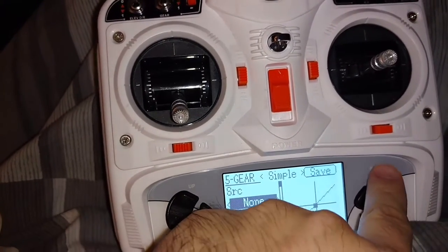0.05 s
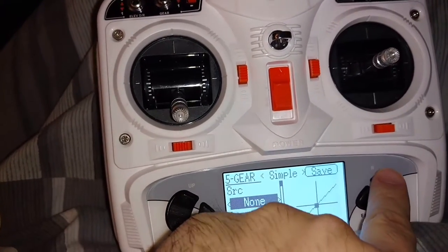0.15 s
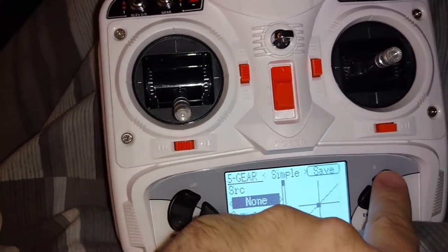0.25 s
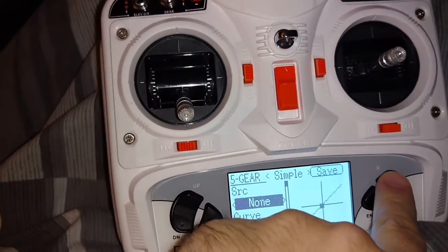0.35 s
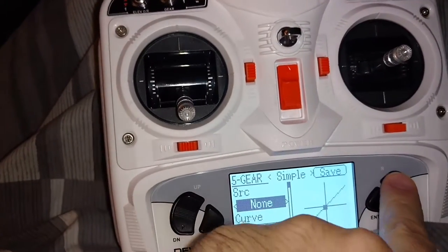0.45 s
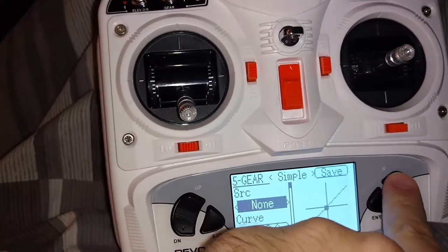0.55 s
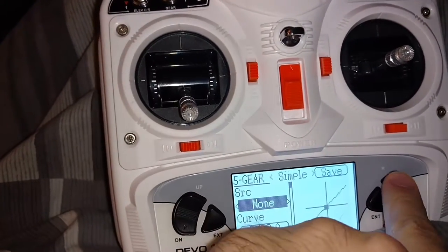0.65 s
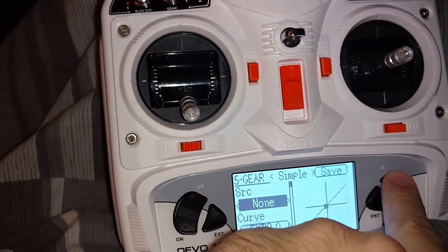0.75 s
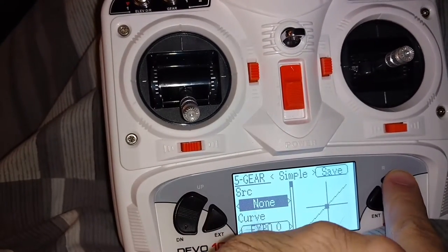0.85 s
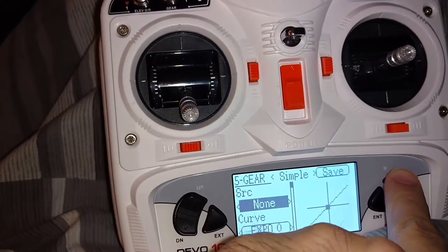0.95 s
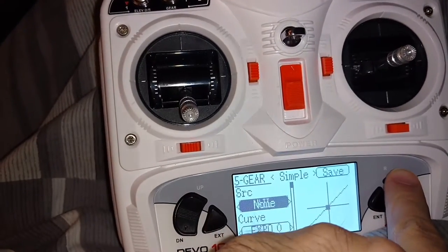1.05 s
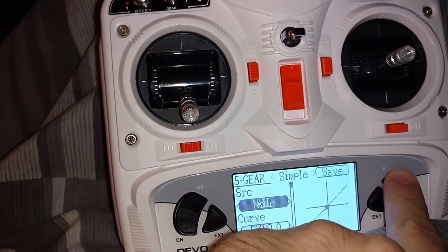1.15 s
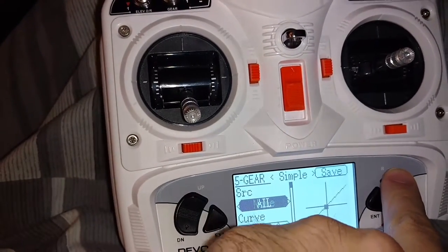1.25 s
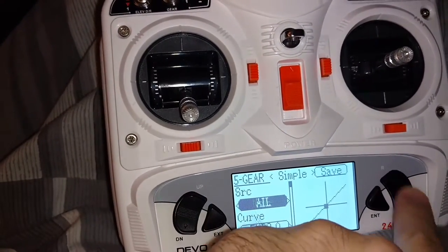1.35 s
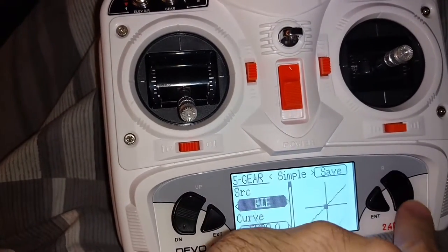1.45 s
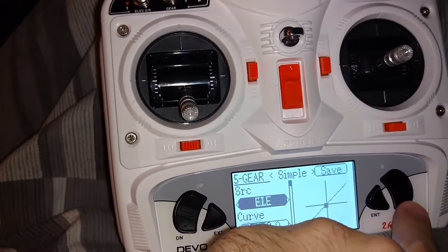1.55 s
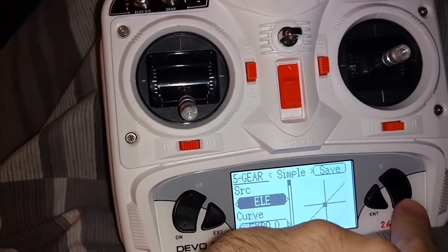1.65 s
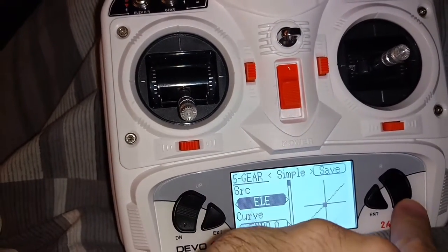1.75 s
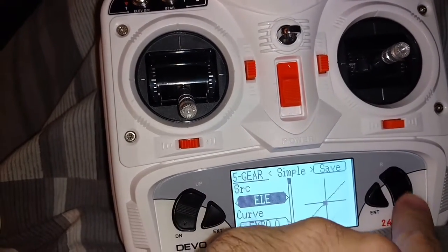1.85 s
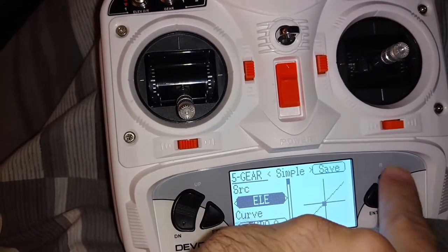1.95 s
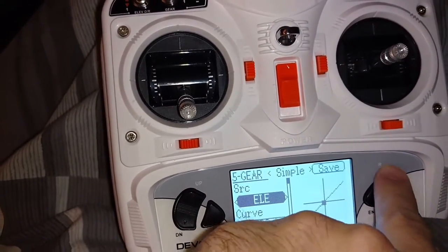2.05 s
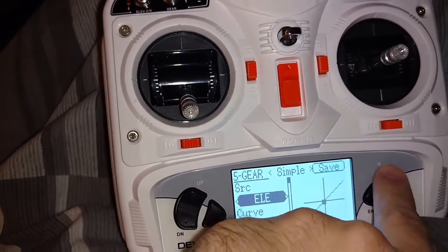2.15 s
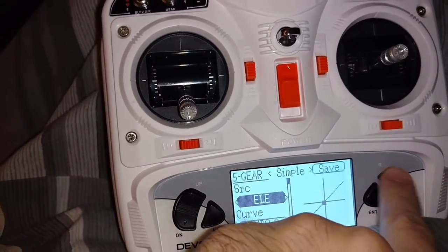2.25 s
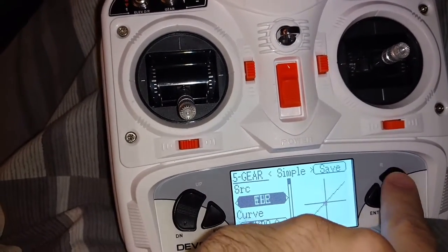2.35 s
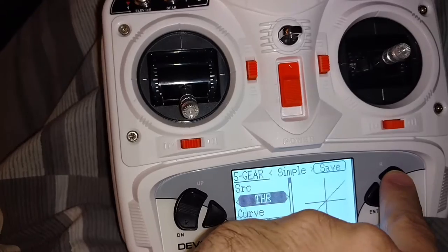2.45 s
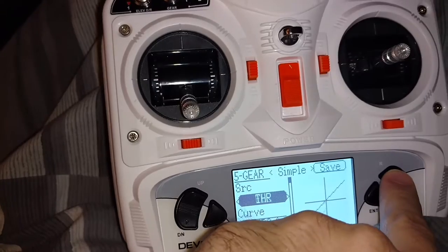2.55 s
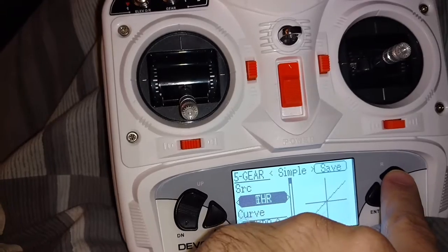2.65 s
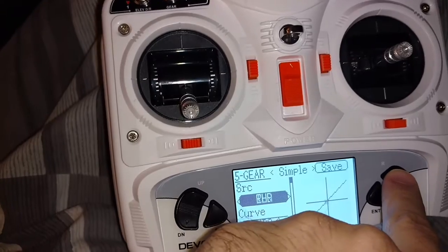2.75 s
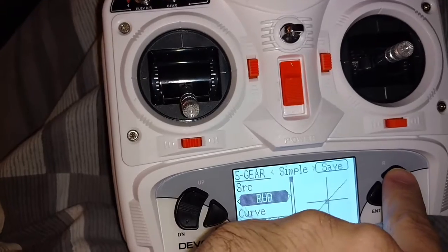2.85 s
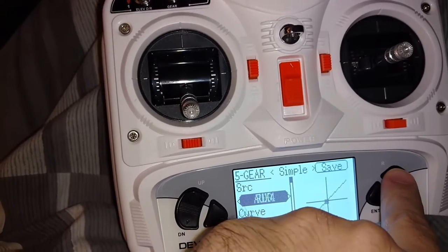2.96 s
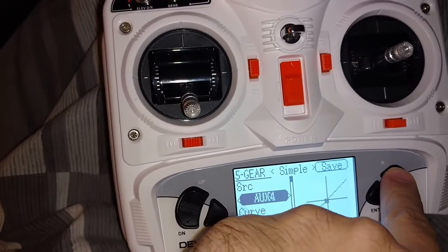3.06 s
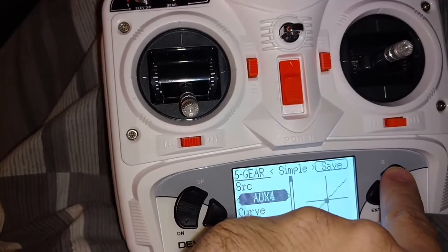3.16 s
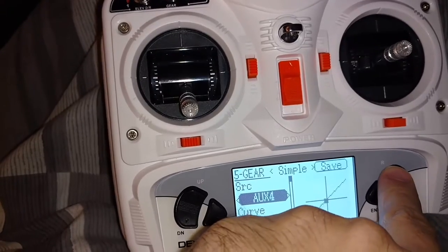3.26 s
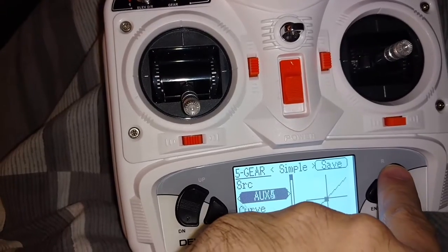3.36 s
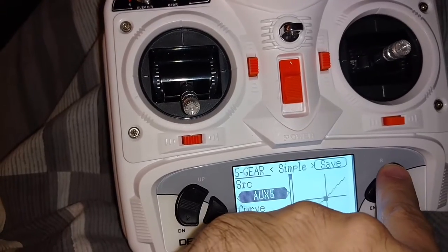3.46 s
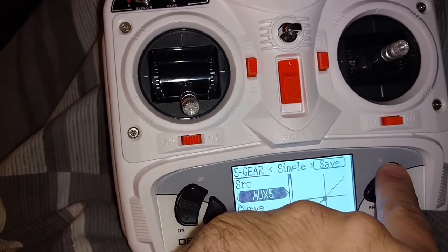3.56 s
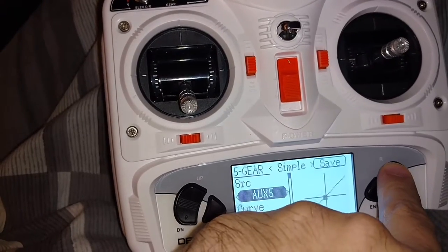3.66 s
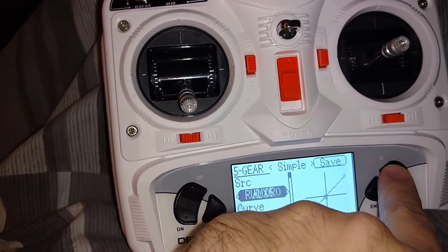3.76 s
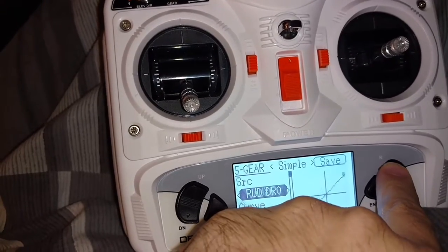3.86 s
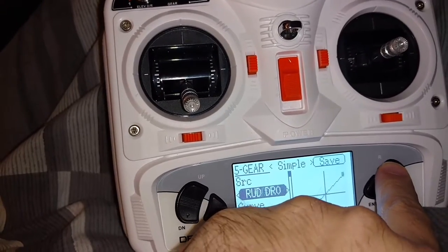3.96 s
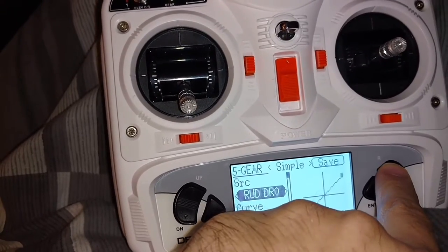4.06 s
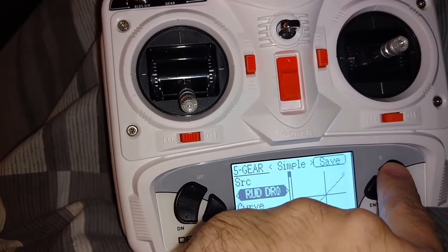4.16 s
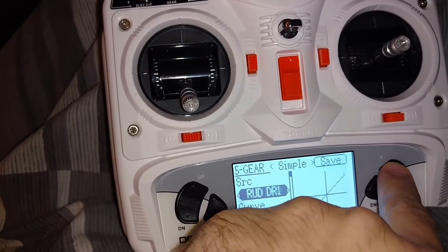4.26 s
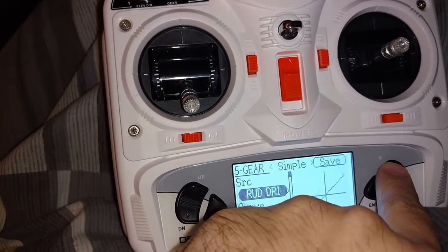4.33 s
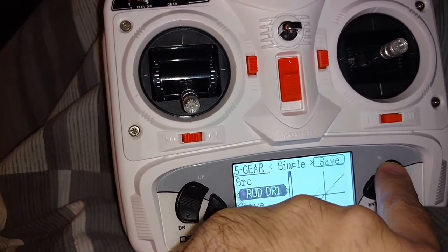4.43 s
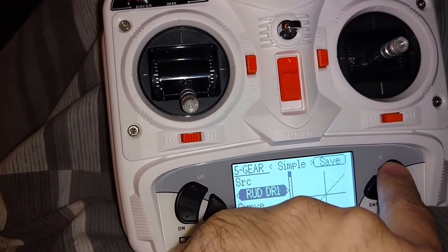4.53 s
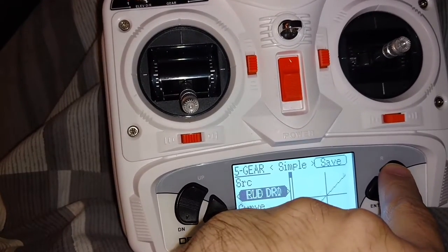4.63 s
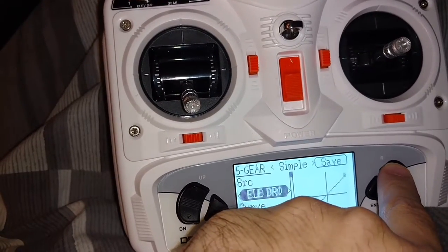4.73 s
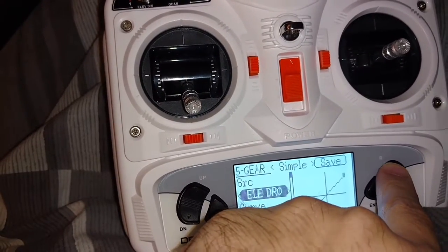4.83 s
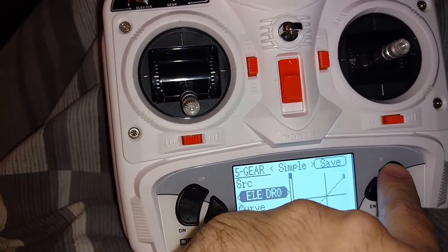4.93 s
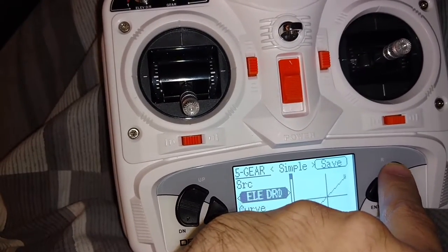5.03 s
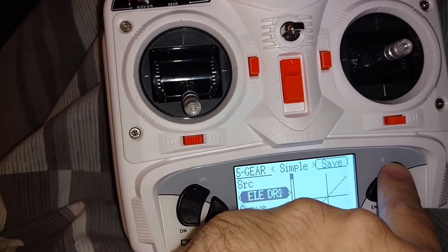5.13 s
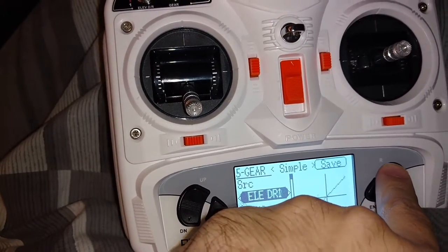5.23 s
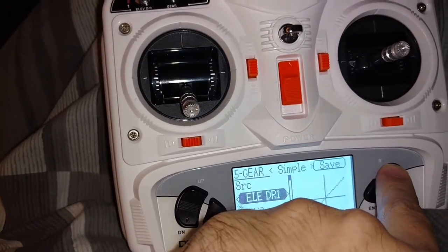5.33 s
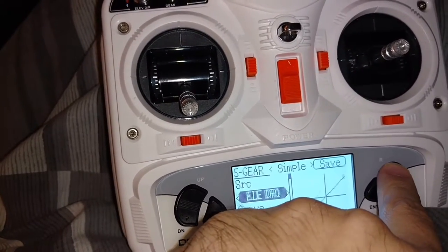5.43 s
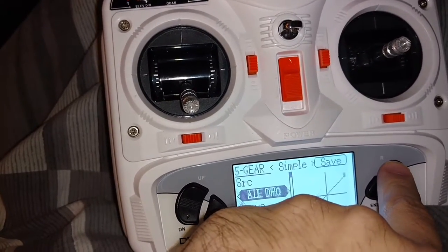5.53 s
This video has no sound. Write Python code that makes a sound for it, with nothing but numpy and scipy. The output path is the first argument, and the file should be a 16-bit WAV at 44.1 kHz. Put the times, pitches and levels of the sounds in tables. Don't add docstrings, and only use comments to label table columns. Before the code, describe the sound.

Close, crisp button presses with softer releases repeat at an unhurried pace, with small creaks, skin rustle and faint microphone hiss.

```python
import sys
import numpy as np
from scipy import signal
from scipy.fft import rfft, irfft, next_fast_len
from scipy.io import wavfile
from scipy.ndimage import uniform_filter1d

SR = 44100
rng = np.random.default_rng(int(sys.argv[2]) if len(sys.argv) > 2 else 0)


def ratio_of_db(decibels):
    return 10 ** (np.asarray(decibels, float) / 20)


def master(y):
    cut = np.clip(np.atleast_2d(y).T, -1, 1)
    pcm = np.round(cut * 32767)
    wavfile.write(sys.argv[1], SR, pcm.astype(np.int16))


N = 246519


def log_curve(points, hz):
    point_hz, value = np.array(points).T
    return np.interp(np.log(hz + 1e-9), np.log(point_hz), value)


def filtered(x, response):
    size = next_fast_len(N + 512)
    hz = np.arange(size // 2 + 1) * SR / size
    return irfft(rfft(x, size) * response(hz), size)[:N]


def sos_filtered(x, sos):
    return signal.sosfilt(sos, x)


def noise(spectrum):
    return filtered(rng.standard_normal(N), lambda hz: ratio_of_db(log_curve(spectrum, hz)))


def rms_one(x):
    return x / np.sqrt(np.mean(x ** 2) + 1e-20)


def strikes(times, sizes):
    clicks = np.full(N, 1e-18)
    clicks[np.round(np.asarray(times) * SR).astype(int)] += sizes
    return clicks


def ring(clicks, hz, t60):
    radius = ratio_of_db(-60 / (t60 * SR))
    angle = 2 * np.pi * hz / SR
    return signal.lfilter([0, np.sin(angle)], [1, -2 * radius * np.cos(angle), radius ** 2], clicks)


WHINE_HZ = [6993, 7913]
# (left level [dB], right level [dB])
WHINE_DB = [
    [-77, -112],
    [-81.5, -78],
]


def whines():
    width_hz = 16
    t60 = np.log(1000) / np.pi / width_hz
    total = 0
    for hz, port_db in zip(WHINE_HZ, WHINE_DB):
        once = ring(rng.standard_normal(N), hz, t60)
        total = total + ratio_of_db(np.array(port_db))[:, None] * rms_one(ring(once, hz, t60))
    return total


def hum():
    waver = rms_one(uniform_filter1d(rng.standard_normal(N), size=4000))
    phase = 2 * np.pi * 119.5 * np.arange(N) / SR + 0.083 * waver
    mains = ratio_of_db(-52 + 0.28 * waver) * np.sin(phase)
    drone = rms_one(ring(rng.standard_normal(N), 347.4, t60=0.13))
    return mains + ratio_of_db(-52) * drone


# (frequency [Hz], level per Hz [dB])
ROOM_AIR = [(30, -13), (60, -16.5), (100, -6.5), (250, -2), (345, -4.5), (500, -3.5), (800, -18.5),
            (1500, -15.5), (2500, -21.5), (4000, -25), (8000, -37.5), (15000, -79), (16500, -68)]


def room_air():
    return ratio_of_db(-47) * rms_one(noise(ROOM_AIR))


# (frequency [Hz], level per Hz [dB])
LEFT_HISS = [(60, -0.5), (300, 7), (900, -5), (1900, -9), (2600, 4), (3200, -18.5), (4800, -6),
             (6000, -29.5), (8800, -5.5), (11000, -22.5), (15000, -16), (16500, -53)]
RIGHT_HISS = [(60, -50), (300, -13), (900, -27), (2000, -29), (4000, -17), (8000, -18), (11000, -16),
              (15000, -29.5), (16500, -60)]


def port_hiss():
    return ratio_of_db(-44.5) * np.array([noise(LEFT_HISS), noise(RIGHT_HISS)])


# (time [s], peak level [dB], frequency [Hz])
KNOCKS = [
    (0.118, -39, 139),
    (.25, -50, 55.1),
    (2.10, -51, 50),
]


def knocks():
    bumps = sum(ring(strikes([s], ratio_of_db(db)), hz, 10 / hz) for s, db, hz in KNOCKS)
    return sos_filtered(bumps, signal.butter(2, 260, fs=SR, output="sos"))


# (time of fullest contact [s], length [s], level [dB])
BRUSH = [
    (0.628, 0.64, -47),
    (2.016, 0.15, -48),
    (2.394, 0.11, -47),
]
# (frequency [Hz], level per Hz [dB])
BRUSH_COLOUR = [(200, 3), (600, 8), (1500, 6), (3500, -3.5), (6000, -7.5), (10000, -19), (15000, -12),
                (16500, -29)]


def brush():
    rise_share, edge_fall_db = 0.61, 47
    t, level = np.arange(N) / SR, 0
    for s, length, db in BRUSH:
        away = (t - s) / length / np.where(t < s, rise_share, 1 - rise_share)
        level = level + ratio_of_db(db - edge_fall_db * np.minimum(away ** 2, 10))
    slip_now = rng.random(N) < 260 / SR
    slips = uniform_filter1d(slip_now * rng.exponential(1, N), size=60)
    return level * rms_one(noise(BRUSH_COLOUR) * (1 + 0.47 * rms_one(slips)))


# (frequency [Hz], level [dB], t60 [s])
TICK = [(5070, -3.5, 0.0024), (6380, -7, 0.011), (7600, -17, .003), (8440, -12, .003)]
# (time of the first [s], number of ticks)
TICK_RUNS = [
    (.3095, 5),
    (1.9228, 12),
]


def ticks():
    period_s = 0.32
    times = np.concatenate([first + period_s * np.arange(steps) for first, steps in TICK_RUNS])
    db = -37.5 + 1.0 * rng.standard_normal(len(times))
    rings = sum(ring(strikes(times, ratio_of_db(db + mode_db)), hz, t60) for hz, mode_db, t60 in TICK)
    return sos_filtered(rings, signal.butter(3, [4200, 10500], "band", fs=SR, output="sos"))


# (time [s], peak level [dB], pitch [Hz])
SCUFFS = [
    (.5841, -44, 5660),
    (.629, -59, 5470),
    (2.0075, -42, 5900),
    (2.012, -42, 7200),
    (2.39, -38, 6000),
    (2.394, -44, 5700),
]


def scuffs():
    return sum(ring(strikes([s], ratio_of_db(db)), hz, 0.0029) for s, db, hz in SCUFFS)


# (time [s], finger force [dB], sharpness of the flip [dB], hardness of the fingertip [dB])
SNAPS = [(0.7864, -16, -13.5, 3), (1.0058, -15, -27.5, 10), (1.302, -14, -12, 1.5), (1.4198, -14, -19.5, 4),
         (2.1789, -14, -17, -0.3), (2.3353, -14.5, -45.5, 1), (2.5503, -16, -13, 1), (2.9374, -13, -40, 5),
         (3.1393, -12.5, -17, 3.5), (3.2639, -13.5, -42, 7), (3.571, -13, -21.5, -4.5),
         (3.7315, -14, -42, -5), (3.9493, -12.5, -18.5, 0.5), (4.1558, -15.5, -32.5, -10),
         (4.4284, -12, -18, -3.5), (4.6073, -15.5, -42, -25), (4.861, -12, -19.5, -5),
         (5.0457, -14.5, -49.5, 7.5), (5.2812, -13, -17, 2), (5.4465, -14, -42.5, -2)]
SNAP_S, FORCE_DB, SHARP_DB, TIP_DB = np.transpose(SNAPS)


def snap_modes(lead_s, db, modes):
    luck_db = 1.3 * rng.standard_normal((len(SNAP_S), len(modes)))
    way = (-1.) ** np.arange(len(SNAP_S))
    total = 0
    for k, (hz, mode_db, t60, sign) in enumerate(modes):
        clicks = strikes(SNAP_S - lead_s, way * ratio_of_db(db + mode_db + luck_db[:, k]))
        total = total + sign * ring(clicks, hz, t60)
    return total


# (frequency [Hz], level [dB], t60 [s], signed weight)
CASE = [(326, 5, 0.053, 1), (569.6, -8, 0.053, 0.77), (794.5, -4, 0.021, 0.89), (871, -2, 0.025, 0.39),
        (1046, -10, 0.017, 0.37), (1230, -27.5, 0.053, 0.33)]


def case():
    bump = np.hanning(22) / np.hanning(22).sum()
    push = np.r_[0.56 * bump, -bump]
    return np.convolve(snap_modes(0.00098, FORCE_DB - 4, CASE), push)[:N]


def flip_db(base_db, follows, feels_tip):
    return base_db + follows * SHARP_DB + feels_tip * TIP_DB


def dome_db():
    return flip_db(-8.5, follows=0.93, feels_tip=0.57)


# (frequency [Hz], level [dB], t60 [s], signed weight)
WALL = [(1090, 2, 0.0073, -1.03), (1761, -1.5, 0.022, -0.54), (2060, -7.5, 0.019, -0.91)]
# (frequency [Hz], level [dB], t60 [s], signed weight)
CAP = [(2820, -14, 0.027, -0.19), (3027, -13.5, 0.0062, 0.016), (3420, 7, 0.0052, -0.37),
       (4240, -8, 0.0041, -1.18)]
# (frequency [Hz], level [dB], t60 [s], signed weight)
DOME = [(4800, -12, 0.054, 0.054), (5900, -13, 0.0086, 0.19), (6000, -13, 0.013, -0.71),
        (7440, -21, 0.014, -0.45), (7940, -9, 0.0087, -0.96), (8330, -35, 0.0076, 0.4),
        (9900, -18, 0.018, -1.1), (13800, -12, 0.0011, -1.6)]


def switch():
    flip_lead_s = 0.00011
    wall = snap_modes(flip_lead_s, flip_db(-14.5, follows=0.41, feels_tip=0.82), WALL)
    cap = snap_modes(flip_lead_s, SHARP_DB + 7, CAP)
    dome = snap_modes(flip_lead_s, dome_db(), DOME)
    return sos_filtered(case() + wall + cap + dome, signal.butter(4, 405, "high", fs=SR, output="sos"))


def crack():
    start = strikes(SNAP_S + 0.0002, ratio_of_db(dome_db() - 6))
    fade = signal.lfilter([1], [1, -ratio_of_db(-60 / (0.016 * SR))], start)
    rattle = fade * rng.standard_normal((2, N))
    colour = signal.butter(1, [2500, 7000], "band", fs=SR, output="sos")
    return sos_filtered(rattle, colour) * ratio_of_db([[-2.5], [0]])


def bedroom(x, t60, first_s, cut_hz):
    t = np.arange(int(.25 * SR)) / SR
    wash = rng.standard_normal((2, len(t))) * ratio_of_db(-60 * t / t60) * (t > first_s)
    wash = signal.lfilter([1], [1, -np.exp(-2 * np.pi * cut_hz / SR)], wash)
    wash = wash / np.sqrt(np.sum(wash[0] ** 2))
    return signal.fftconvolve(x[None], wash, axes=1)[:, :N]


# (time [s], depth [dB])
DUCKS = [
    (.79, 0.5),
    (1.31, 1),
    (2.56, 3),
]


def ducking_db():
    turns = np.cumsum([0, 0.03, 0.083, 0.42])  # attack, hold and release in s
    t = np.arange(N) / SR
    return np.min([np.interp(t, s + turns, [0, -db, -db, 0]) for s, db in DUCKS], axis=0)


# (time [s], peak level [dB], pitch [Hz])
TOUCHES = [(1.4982, -32, 3420), (1.9853, -27, 3300), (2.0055, -40, 3550), (2.0104, -33, 3470),
           (2.024, -36, 3660), (2.3588, -25, 3360), (2.3904, -41, 3420), (2.5114, -41, 2760),
           (3.738, -33, 3400), (4.6138, -37, 3500), (4.6906, -42, 3720), (4.793, -40, 3510),
           (5.261, -42, 3200)]


def touches():
    return sum(ring(strikes([s], ratio_of_db(db - 6.5)), hz, 0.0095) for s, db, hz in TOUCHES)


# (frequency [Hz], level [dB])
LEFT_SHADOW = [(100, -3), (330, -4), (860, -8.5), (2000, -27.5), (3400, -6), (4500, -14.5), (7000, 8.5),
               (15000, -17)]


def at_ports(x):
    lag_s, in_phase_hz = 0.000381, 1050

    def shadow(hz):
        late = np.exp(-2j * np.pi * lag_s * np.maximum(hz - in_phase_hz, 0))
        return ratio_of_db(log_curve(LEFT_SHADOW, hz)) * late
    return np.array([filtered(x, shadow), x])


def scene():
    duck = ratio_of_db(ducking_db())
    near = switch() + touches() + scuffs()
    steady = at_ports(brush() + duck * (room_air() + hum())) + duck * port_hiss()
    steady = sos_filtered(steady, signal.cheby2(10, 40, 15600, fs=SR, output="sos"))
    inside = ticks() * ratio_of_db([[0], [-9]]) + knocks() * [[1], [0]] + whines()
    room = ratio_of_db(-31) * bedroom(near, t60=0.24, first_s=0.011, cut_hz=1400)
    return at_ports(near) + crack() + room + steady + inside


def low_pass(x):
    return signal.sosfilt(signal.butter(12, 16490, fs=SR, output="sos"), x)


# (frequency [Hz], share)
CROSS_FEED = [(200, .7), (2200, .76), (4400, .74), (7000, .55), (10000, .66), (14000, .74)]


def record(dry):
    def feed(hz):
        return log_curve(CROSS_FEED, hz) * np.exp(-2j * np.pi * hz * 20 / SR)
    wide = dry - np.array([filtered(port, feed) for port in dry[::-1]])
    wide = sos_filtered(wide, signal.butter(2, 45, "high", fs=SR, output="sos"))
    wide = sos_filtered(wide, signal.cheby2(10, 50, 16450, fs=SR, output="sos"))
    return low_pass(wide)


dry = scene()
out = record(dry)
master(out)
```